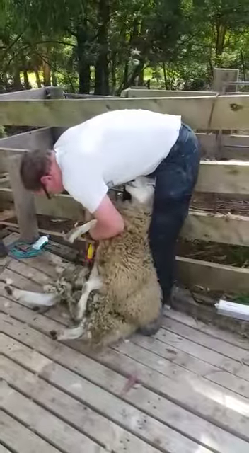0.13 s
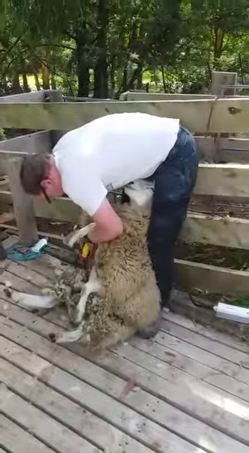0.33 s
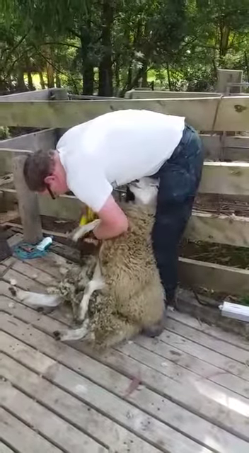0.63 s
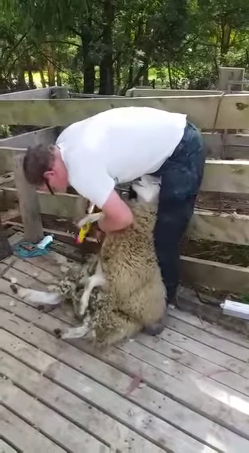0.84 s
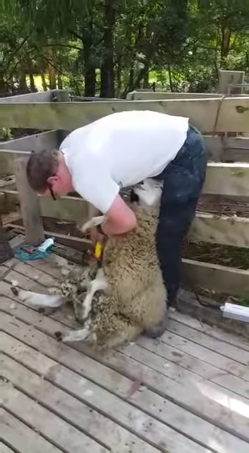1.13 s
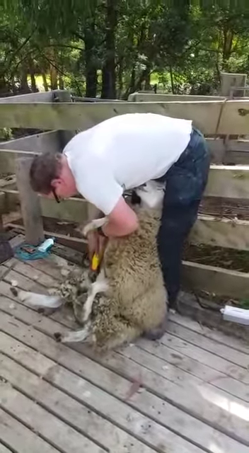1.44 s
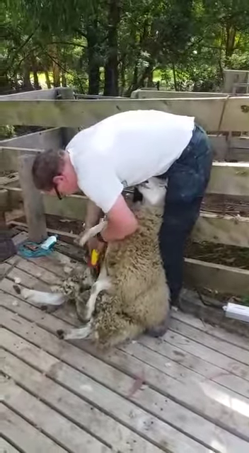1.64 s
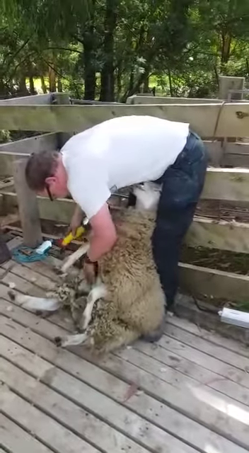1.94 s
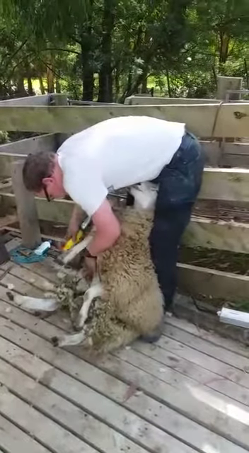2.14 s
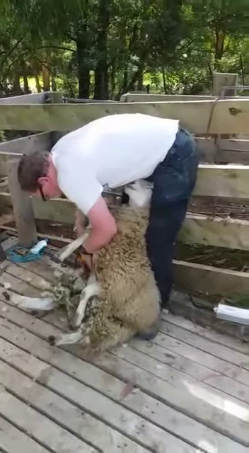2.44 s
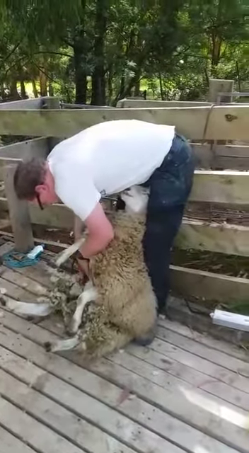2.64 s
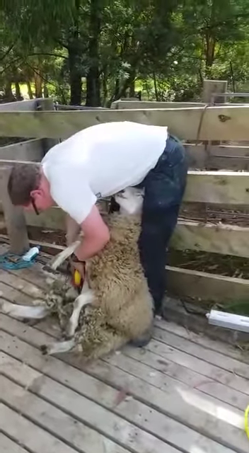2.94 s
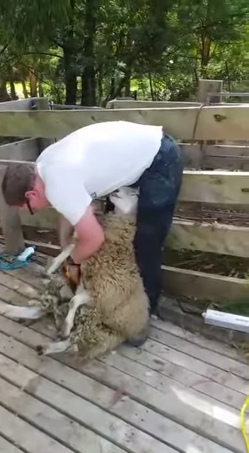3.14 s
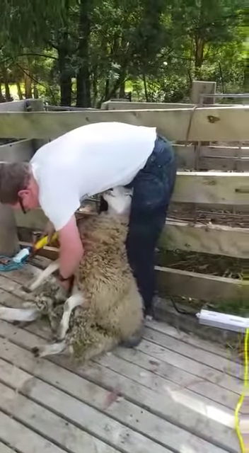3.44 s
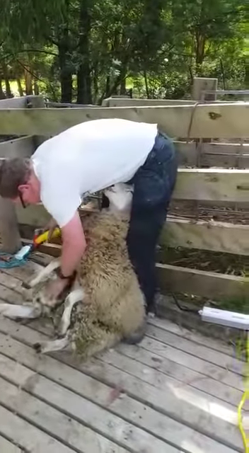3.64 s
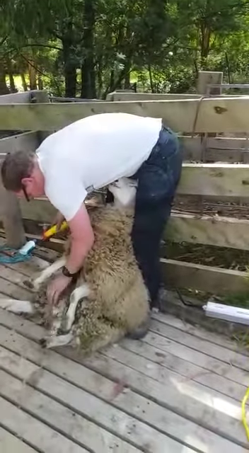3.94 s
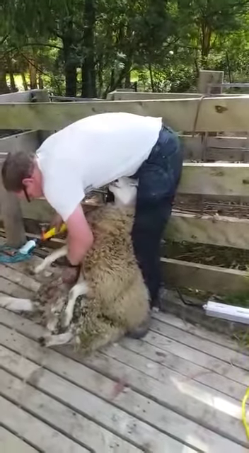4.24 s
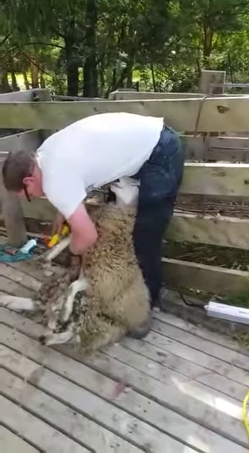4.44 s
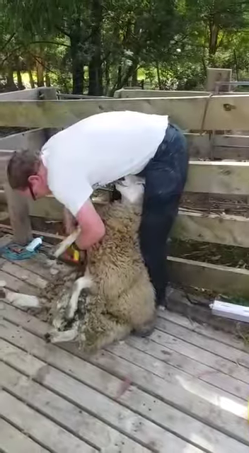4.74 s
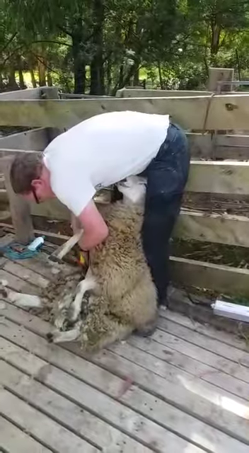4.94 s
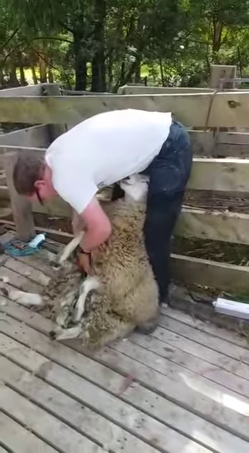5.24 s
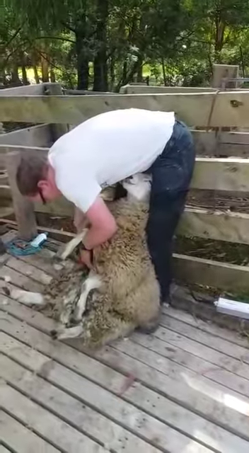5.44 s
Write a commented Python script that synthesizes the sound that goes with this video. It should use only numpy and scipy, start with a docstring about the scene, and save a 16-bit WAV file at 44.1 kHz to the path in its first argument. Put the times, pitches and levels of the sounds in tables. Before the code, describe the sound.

For about 5.6 seconds an electric handpiece shears a sheep on a slatted wooden deck, heard from a few steps away on a hand-held microphone, the same in both channels. The buzz never stops: a rapid rattle of about 48 strokes a second, strongest around 2 to 5 kHz, with bright noisy fizz above and a nasal motor whine beneath. Pitch barely moves, dipping slightly near 1 second, but individual metallic tones swell and fade as the tool turns in the wool. Ringing near 5 kHz is clearer around 1.5 to 2.4, 3.9 and 4.7 seconds. Low, soft bumps that sink in pitch come at the start, around 0.4 to 0.8 and near 2.0 seconds, then most heavily at 3.45 to 3.75 with low rubbing. A faint hollow resonance dips and rises from 3.7 to 4.6. Lighter bumps follow to the end, with the buzz cut off still running.

```python
"""An electric handpiece shears a sheep on a slatted wooden deck, a few steps from a hand-held microphone.
Its geared motor swings a cutter over a comb 48 times a second: periodic impacts give a harmonic rattle,
loose steel and snapping fibres add noise bursts, and shaft, fan and gear teeth add sine tones.
The tone shifts as the tool moves through the fleece. Handling adds low bumps, which sink in pitch, and
low rubbing noise; a faint hollow resonance glides as the arm reaches down."""
import sys
import numpy as np
from scipy import signal
from scipy.fft import rfft, irfft
from scipy.io import wavfile
from scipy.ndimage import uniform_filter1d, map_coordinates

SR = 44100
rng = np.random.default_rng(int(sys.argv[2]) if len(sys.argv) > 2 else 0)


def to_wav(s):
    """Save 16-bit WAV."""
    ch = np.atleast_2d(s).T  # columns
    pcm = np.round(np.clip(ch, -1, 1) * 32767)  # PCM
    wavfile.write(sys.argv[1], SR, pcm.astype(np.int16))


N = 246078
TIME = np.arange(N) / SR  # s
EDGE_HZ = 15800  # upper band limit

# Cutter speed, sagging a little under load: (time [s], stroke rate [1/s])
STROKE_RATE = [(0, 48.34), (.8, 48.3), (.92, 48.2), (1.16, 48.21), (1.48, 48.41), (2.4, 48.34),
               (3.15, 48.44), (3.3, 48.34), (3.5, 48.39), (4.3, 48.37), (4.53, 48.31), (5.2, 48.41),
               (5.58, 48.4)]
# The comb's ring, swelling as the tool comes out from behind fleece and arm; only its
# swing about the mean is used: (time [s], level [dB])
OPENNESS_LEVEL = [(0, -32), (.19, -34), (.38, -32), (.76, -27.5), (.95, -26.5), (1.26, -33), (1.52, -30),
                  (1.95, -31.5), (2.33, -28.5), (2.6, -31.5), (3.05, -33.5), (3.38, -31.5), (3.65, -35.5),
                  (4.15, -34), (4.68, -30), (4.87, -33.5), (5.28, -32.5), (5.58, -34.5)]
# Fibre fizz, rising as the blades bite into more wool; only its swing is used: (time [s], level [dB])
BITE_LEVEL = [(0.0, -47), (0.26, -45.5), (0.57, -43.5), (0.65, -46), (0.75, -42.5), (1.23, -45.5),
              (2.14, -41.5), (2.64, -48.5), (3.03, -48), (3.25, -42), (4.35, -42), (5.19, -48),
              (5.52, -46.5), (5.58, -49.5)]


def amp(db):
    """Amplitude is the exponential of level: 20 dB per factor of ten."""
    return 10 ** (np.asarray(db) / 20)


def unit(x):
    """Normalisation by root mean square, so that a later gain sets the level."""
    return x / np.sqrt(np.mean(abs(x) ** 2) + 1e-20)


def curve(rows):
    """Linear interpolation of (time [s], value) rows at every sample."""
    return np.interp(TIME, *np.transpose(rows))


def swing(rows):
    """Relative level: a curve in dB above and below its own average."""
    db = curve(rows)
    return db - db.mean()


def colour(points, hz):
    """Spectral envelope: gain from (frequency [Hz], level [dB]) rows, interpolated over log frequency."""
    point_hz, db = np.transpose(points)
    return amp(np.interp(np.log(hz + 1), np.log(point_hz), db))


def shaped(x, points):
    """Linear filtering: the spectrum of x is multiplied by a spectral envelope."""
    return irfft(rfft(x) * colour(points, np.fft.rfftfreq(N, 1 / SR)), N)


def drift(rate_hz):
    """Low-pass Gaussian noise of rms 1, moving at up to about the given rate."""
    size = 2048
    hz = np.fft.rfftfreq(size, N / SR / size)
    lowpass = np.exp(-(hz / rate_hz) ** 2) * (hz > 0)
    slow = irfft(rfft(rng.standard_normal(size)) * lowpass)
    return np.interp(TIME, np.linspace(0, N / SR, size), unit(slow))


def shares(hz):
    """Power-complementary crossover: comb, cutter and teeth each radiate their own frequency band."""
    # The comb rings below the first, the cutter between, the teeth above the second: [Hz]
    split_hz = [4240, 5140]
    low, high = (1 / (1 + (split / (hz + 1)) ** 16) for split in split_hz)
    return [1 - low, abs(low - high), high]


def contact(turns, sliding):
    """Periodic excitation: force on comb, cutter and teeth from steady sliding plus knocks in each stroke."""
    # Knocks within one stroke: (place [cycle], width [cycle], then weight in the power
    # added to the sliding, for comb, cutter, teeth [ratio]); negative weights lower it
    knocks = [(.21, 0.024, 1.04, -3, 2.5), (.32, 0.027, 0.63, 1, 2), (.45, 0.027, 1.44, 1.3, -1),
              (.56, 0.016, 1, 2.5, 0), (0.682, 0.03, 0.46, -3, -1.5), (.765, 0.017, 0.92, -3.5, 1.5),
              (0.886, 0.01, 2.8, -7, 2.5), (.96, 0.036, 0.55, 1, -1.5)]
    power = 0
    for place, width, *weights in knocks:
        distance = (turns - place + .5) % 1 - .5
        power = power + np.outer(weights, np.exp(-.5 * (distance / width) ** 2))
    return [unit(np.sqrt(abs(sliding + row))) for row in power]


def rattle(turns, count=21, size=8192, kept=0.55, evenness=0.23, sliding=0.47, singing_fade_db=2):
    """Fourier series of a repeated impact pattern, cross-fading slowly through poses of the tool."""
    # Envelope of the stroke harmonics: (frequency [Hz], level of each harmonic [dB])
    harmonic_envelope = [(350, -84.5), (550, -72), (850, -78), (1150, -74), (1450, -61), (2200, -51.5),
                         (2900, -53), (3400, -49.5), (4150, -53.5), (4950, -60.5), (5900, -59), (6600, -53),
                         (7800, -53.5), (8200, -58.5), (10300, -81), (12300, -68.5), (16000, -86)]
    # Harmonics that stand out of it: (multiple of the stroke rate, level [dB])
    strong_harmonics = [(15, -64), (17, -63.5), (18, -63.5), (19, -66.5), (21, -69), (31, -55.5), (36, -51),
                        (37, -57), (40, -43.5), (41, -58), (48, -50), (50, -51), (57, -42.5), (58, -47),
                        (63, -41.5), (65, -41), (66, -43), (71, -51), (72, -46.5), (101, -48.5), (107, -47)]
    # Harmonics that sing out: (multiple of the stroke rate, rounded below, level [dB],
    # response to openness [dB/dB], response to bite [dB/dB])
    singing_harmonics = [(9, -73, -0.3, -1.16), (13, -65, 1.34, -0.3), (33, -51.5, -.5, 0.5),
                         (45, -42.5, 0.1, 1), (67.16, -39.5, 1, 0), (69.28, -40.5, 1.3, -0.8),
                         (72.94, -40.5, 0.25, -0.1), (73.75, -41.5, -0.5, 0)]
    order = np.arange(size // 2 + 1)
    hz = order * STROKE_RATE[0][1]
    level = colour(harmonic_envelope, hz) * (hz < EDGE_HZ) * (order > 0)
    for k, db in strong_harmonics:
        level[round(k)] = amp(db)
    level = np.tile(level, (count, 1))  # one row per pose

    pose_times = np.linspace(0, TIME[-1], count)
    openness = np.interp(pose_times, TIME, swing(OPENNESS_LEVEL))
    bite = np.interp(pose_times, TIME, swing(BITE_LEVEL))
    for k, db, by_openness, by_bite in singing_harmonics:
        fade = singing_fade_db * rng.standard_normal(count)  # chance swelling as the tool is turned
        level[:, round(k)] = amp(db + by_openness * openness + by_bite * bite + fade)

    grain = rng.standard_normal((count + 1, size))
    kept = np.clip(kept, 0, 1)
    grain = np.sqrt(kept) * grain[0] + np.sqrt(1 - kept) * grain[1:]  # part outlasts every pose
    lines = 0
    for share, force in zip(shares(hz), contact(np.arange(size) / size, sliding)):
        lines = lines + share * rfft(grain * force)
    singing = [round(row[0]) for row in singing_harmonics]
    lines[:, singing] = np.exp(1j * np.angle(lines[:, singing].mean(0)))  # these hold their phase
    lines /= abs(lines) ** np.clip(evenness, 0, 1)
    lines /= np.sqrt(np.mean(abs(lines) ** 2, 0))
    cycles = irfft(lines * level) * size / np.sqrt(2)
    pose = TIME / TIME[-1] * (count - 1)
    return map_coordinates(cycles, [pose, turns % 1 * size], order=1, mode="grid-wrap")


def chatter(turns, sliding=4.2, uneven_db=0.64, snip_db=1.2):
    """Amplitude-modulated noise: loose steel and snapping fibres, no two knocks equally hard."""
    # Noise spectrum: (frequency [Hz], level in a band one harmonic wide [dB])
    noise_spectrum = [(25, -91), (200, -75.5), (480, -75), (720, -67.5), (1080, -70.5), (1380, -55.5),
                      (1650, -54), (1900, -46.5), (2300, -47.5), (2800, -50), (3350, -47.5), (4200, -56.5),
                      (5050, -52.5), (5900, -59.5), (7000, -56), (8250, -51), (9300, -64.5), (10500, -73.5),
                      (12600, -62), (14200, -66.5), (16000, -66)]
    spectrum = 0
    for share, force in zip(shares(np.fft.rfftfreq(N, 1 / SR)), contact(turns, sliding)):
        force = force * amp(uneven_db * drift(83) + snip_db * rng.standard_normal(N))
        spectrum = spectrum + np.sqrt(share) * rfft(unit(force * rng.standard_normal(N)))
    band_share = STROKE_RATE[0][1] / (SR / 2)  # one harmonic's share of the whole band
    return shaped(irfft(spectrum, N), noise_spectrum) / np.sqrt(band_share)


def clatter(per_s=260, spread_db=2):
    """Random impulses excite damped resonators: gear play lets parts hit the housing, out of step."""
    # The housing's ring: (frequency [Hz], bandwidth of each of two equal poles [Hz], level before play [dB])
    housing_modes = [(1957, 200, -50.5), (2168, 190, -41.5), (2301, 140, -41)]
    # How loosely the drive rattles as the grip changes: (time [s], gain [dB])
    play_gain = [(0, -1), (.17, 5), (.42, 6), (.7, -3), (1.2, 2.5), (2.25, 2), (2.5, -6), (2.9, 1),
                 (3.6, 2), (4.15, -1), (4.4, 4), (4.85, -2), (5.2, -5), (5.58, 5.5)]
    struck = rng.random(N) < per_s / SR
    sign = rng.choice([-1, 1], N)
    hits = struck * sign * amp(spread_db * rng.uniform(-2.2, 2.3, N))
    out = 0
    for hz, width, db in housing_modes:
        pole = np.exp((2j * np.pi * hz - np.pi * width) / SR)
        ring = signal.lfilter([1], np.poly([pole, pole]), hits)
        ring = ring * np.exp(2j * np.pi * rng.random())  # random phase
        out = out + amp(db) * unit(ring.real)
    return amp(curve(play_gain)) * out


def moving(x, patch_db=1.35):
    """Time-varying filtering: parts follow openness, bite and teeth; deck reflections ripple the spectrum."""
    # The teeth's bright band; only its swing is used: (time [s], level [dB])
    teeth_level = [(0, -30), (.24, -28.7), (.41, -30), (.64, -29), (.97, -30), (1.17, -31.8), (1.6, -30),
                   (1.88, -31.5), (2.11, -30), (3.08, -30.5), (3.19, -28), (3.33, -30), (3.87, -29.5),
                   (4.42, -29), (4.7, -29), (5.58, -30)]
    # Answers of motor body, housing, comb, cutter, teeth and fibres: (frequency [Hz],
    # response to openness [dB/dB], response to bite [dB/dB], response to teeth level [dB/dB])
    part_answers = [(420, 0.44, -0.36, 0), (820, 0, 0.35, 0), (1500, 0, 0.22, -0.5), (2210, 0, 0.23, 0),
                    (3430, 0.7, 0.27, 0), (4930, .5, 0.42, 0), (7300, 0, 0.01, 1.2), (12500, 0, 0.5, -0.5)]
    hz, t, spectra = signal.stft(x, SR, nperseg=1024, noverlap=768)
    part_hz, *answers = np.transpose(part_answers)
    db = 0
    for answer, control in zip(answers, (OPENNESS_LEVEL, BITE_LEVEL, teeth_level)):
        db = db + np.outer(np.interp(hz, part_hz, answer), np.interp(t, TIME, swing(control)))
    ripple = rng.standard_normal(spectra.shape)
    for _ in range(2):  # smooth over frequency, then time
        ripple = uniform_filter1d(uniform_filter1d(ripple, size=3, axis=0), size=26, axis=1)
    spectra = spectra * amp(db + patch_db * unit(ripple))
    return signal.istft(spectra, SR, nperseg=1024, noverlap=768)[1][:N]


def ping(turns, hz=4970, rise_s=0.0011, place=.85):
    """Damped free vibration: struck at the end of its swing, the cutter rings for a few milliseconds."""
    # The ring, most free when the cutter is out of the wool: (time [s], rms level [dB])
    ping_level = [(0, -58), (1.25, -46), (1.55, -41), (2.4, -42), (2.65, -48), (3.45, -45.5), (3.85, -37.5),
                  (4.2, -40), (4.35, -56), (4.7, -39.5), (5.05, -55), (5.58, -58)]
    since = (turns - place) % 1 / STROKE_RATE[0][1]  # s since the blow
    ring = since * np.exp(-since / rise_s) * np.sin(2 * np.pi * hz * since)
    return amp(curve(ping_level)) * unit(ring)


def motor(turns, gear=21 / 4, flutter=0.0036, fade_hz=6.2):
    """Rotational harmonics: shaft, fan and gear teeth sound; gear play makes the high lines flutter."""
    # Whine: (multiple of the shaft rate, rms level [dB], response to openness [dB/dB],
    # response to bite [dB/dB], chance fading [dB])
    whine_lines = [(1, -68, 0.2, -0.7, 0.5), (5, -53, 0.46, -.5, 1), (15, -48.5, 0.36, 0, 3.5),
                   (30, -48, 0.3, -1.5, 4.5)]
    shaft = gear * turns + flutter * drift(24)  # shaft turns
    openness, bite = swing(OPENNESS_LEVEL), swing(BITE_LEVEL)
    out = 0
    for k, db, by_openness, by_bite, fade_db in whine_lines:
        level = amp(db + by_openness * openness + by_bite * bite + fade_db * drift(fade_hz))
        out = out + np.sqrt(2) * level * np.sin(2 * np.pi * round(k) * shaft)
    return out


def handpiece(rattle_db=-1.11, chatter_db=-0.21, jitter=0.00052):
    """Kinematic coupling: one drive turns cutter and motor together."""
    turns = np.cumsum(curve(STROKE_RATE)) / SR + jitter * drift(6.3)  # strokes made so far
    steel = amp(rattle_db) * rattle(turns) + amp(chatter_db) * chatter(turns) + clatter()
    return moving(steel) + ping(turns) + motor(turns) + hollow()


def shuffle(attack_s=0.012, release_s=0.024, still_db=-71.5):
    """Friction noise: the powers of rubbing spells, each rising, holding and dying, add to a faint rumble."""
    # Spells of rubbing as the grip shifts: (start [s], length [s], level [dB])
    spells = [(0.017, .08, -46), (0.415, .1, -46), (0.54, .13, -51.5), (0.72, 0.37, -64), (1.94, .07, -51),
              (2.03, 0.067, -59), (2.55, .28, -70), (3.2, 0.074, -52), (3.383, 0.17, -47),
              (3.59, 0.15, -43), (3.747, 0.074, -47.5), (3.866, 0.047, -49), (4.437, .1, -56.5),
              (4.72, 0.22, -58), (5.08, .48, -55.5), (5.458, 0.053, -46)]
    # Spectral shape: (frequency [Hz], relative level [dB])
    rumble_spectrum = [(20, -50), (32, -28), (48, 1.5), (70, 8), (120, -1), (170, -10.5), (250, -13),
                       (600, -35), (2000, -90)]
    power = amp(still_db) ** 2
    for start, length, db in spells:
        attack = np.clip((TIME - start) / attack_s, 0, 1)
        release = np.exp(-np.maximum(TIME - start - length, 0) / release_s)
        power = power + (amp(db) * attack * release) ** 2
    return np.sqrt(power) * unit(shaped(rng.standard_normal(N), rumble_spectrum))


def handling(bump_db=-3, rise_s=0.013, sag=3.1, start=1.157, rough=0.25):
    """Transient oscillation: uneven bumps swell for a few cycles and sink in pitch, over a low shuffle."""
    # Bumps: (start [s], peak level before the common gain and roughening [dB],
    # nominal pitch before the starting ratio and sag [Hz])
    bumps = [(0.035, -36, 96), (0.074, -45, 65), (0.325, -50, 85), (0.445, -43, 115), (0.489, -39, 103),
             (0.713, -44.5, 109), (0.765, -46, 90), (0.849, -42, 72), (1.285, -51, 102), (1.41, -48, 86),
             (1.51, -50, 78), (1.604, -54, 86), (1.972, -37.5, 81), (2.229, -49, 81), (2.368, -50, 124),
             (3.145, -46, 84.5), (3.226, -43, 87), (3.455, -28.5, 114), (3.598, -30.5, 126),
             (3.631, -31, 100), (3.695, -30, 79.6), (3.874, -40.5, 112), (4.3, -48, 83.6),
             (4.419, -53, 192), (4.746, -42, 89), (4.867, -44, 86), (5.244, -38, 111), (5.477, -35.5, 108)]
    out = shuffle()
    t = np.arange(SR // 8) / SR
    swell = (t / rise_s * np.exp(1 - t / rise_s)) ** 2
    scuff = rough * (drift(82) + 1j * drift(66))  # rubbing roughens each bump
    for s, db, hz in bumps:
        at = max(round(s * SR), 0)
        cycles = start * hz * t / (1 + sag * t)
        thud = (amp(db + bump_db) * swell * np.exp(2j * np.pi * cycles))[:N - at]
        end = at + len(thud)
        out[at:end] += (thud * (1 + scuff[at:end])).imag
    return out


def hollow(width_hz=18):
    """Cavity resonance: narrow-band noise whose centre follows the gap between arm and fleece."""
    # Gliding note as the arm reaches down: (time [s], frequency [Hz], rms level [dB])
    glide = [(3.6, 740, -78), (3.85, 660, -61), (4.0, 630, -69), (4.16, 665, -61), (4.33, 730, -65),
             (4.55, 840, -70), (4.7, 860, -85)]
    s, hz, db = np.transpose(glide)
    carrier = np.exp(2j * np.pi * np.cumsum(np.interp(TIME, s, hz)) / SR)
    noise = drift(width_hz) + 1j * drift(width_hz)
    return amp(np.interp(TIME, s, db)) * (noise * carrier).real


def scene():
    """Linear superposition of the sources, identical in both channels."""
    return np.tile(handpiece() + handling(), (2, 1))


def record(dry, low_cut_hz=46):
    """Band limitation: the microphone's low cut and the recorder's upper edge."""
    low_cut = signal.butter(4, low_cut_hz, "high", fs=SR, output="sos")
    dry = signal.sosfilt(low_cut, dry)
    band_limit = signal.firwin(1023, EDGE_HZ, window=("kaiser", 9), fs=SR)
    return signal.oaconvolve(dry, band_limit[None], "same")


dry = scene()
out = record(dry)
to_wav(out)
```